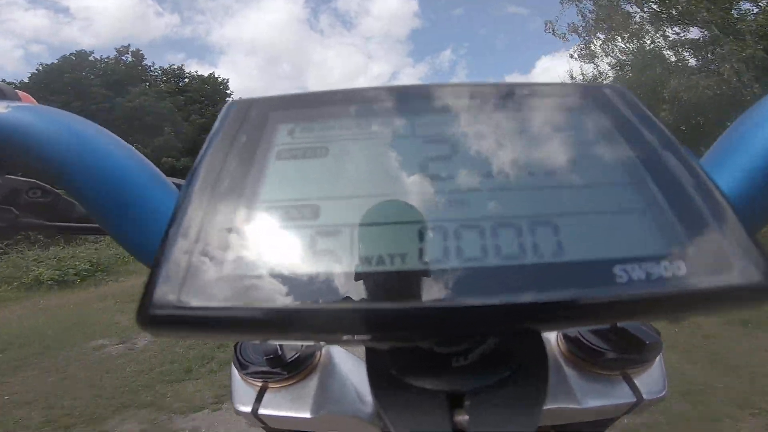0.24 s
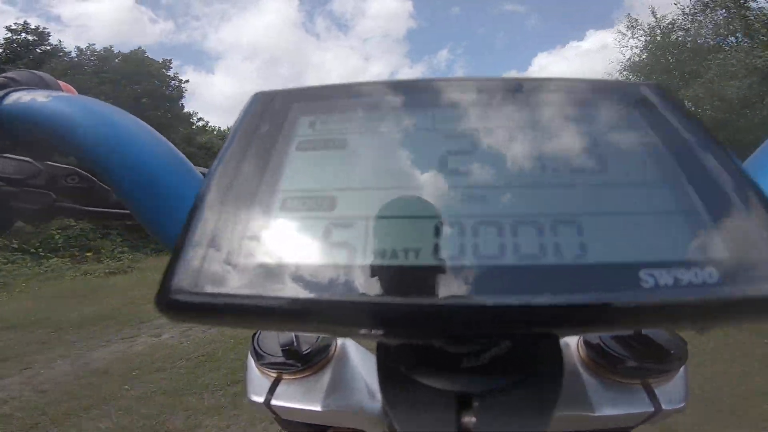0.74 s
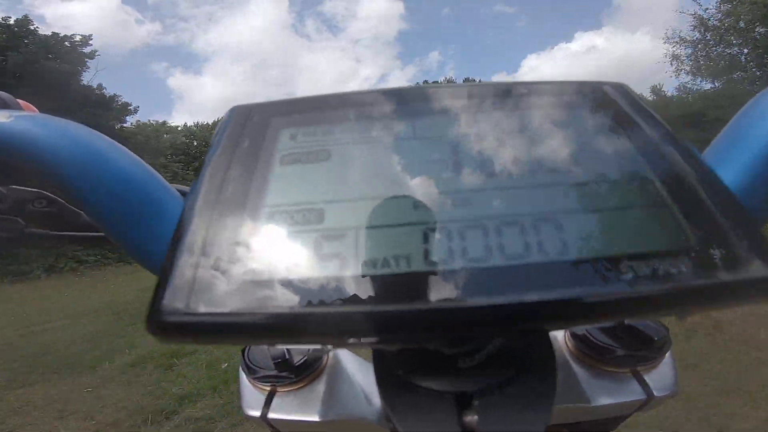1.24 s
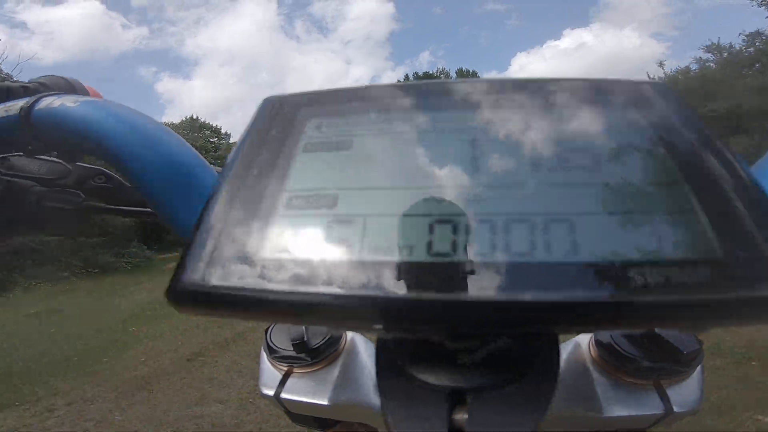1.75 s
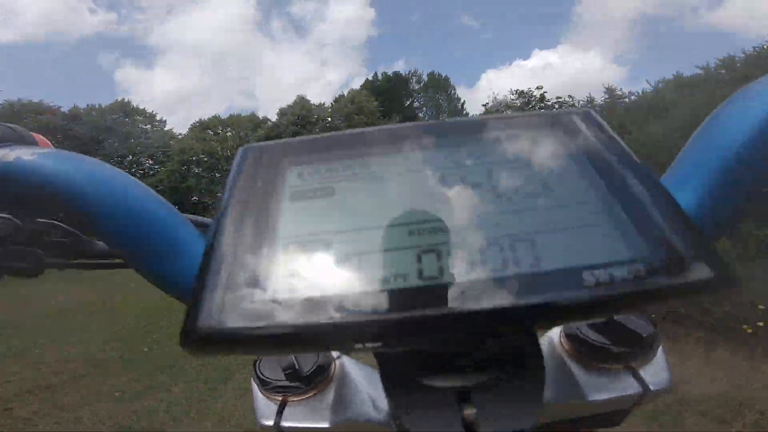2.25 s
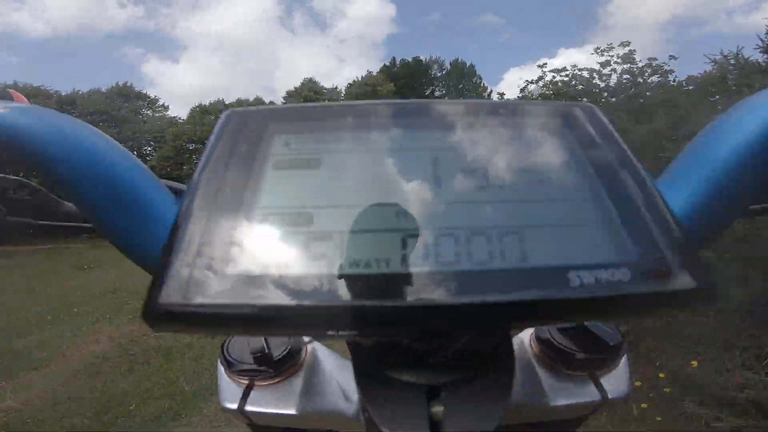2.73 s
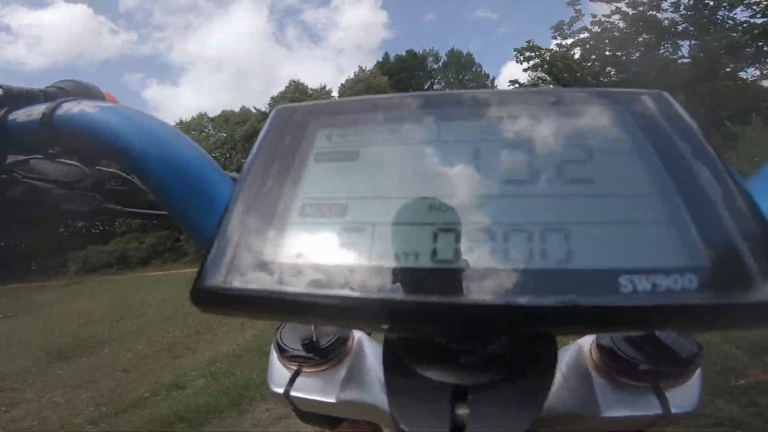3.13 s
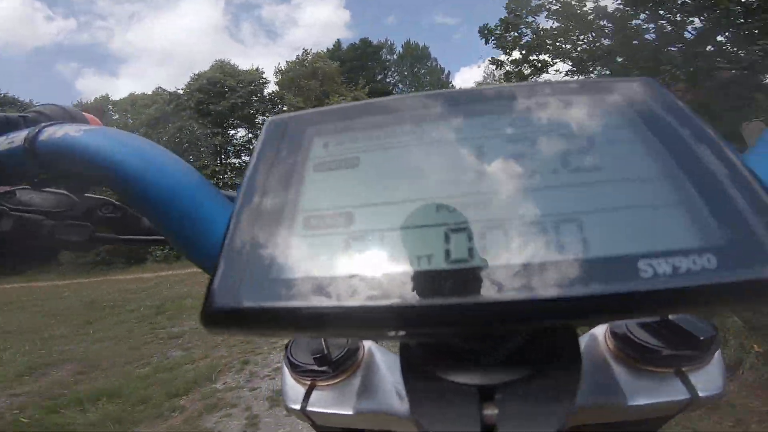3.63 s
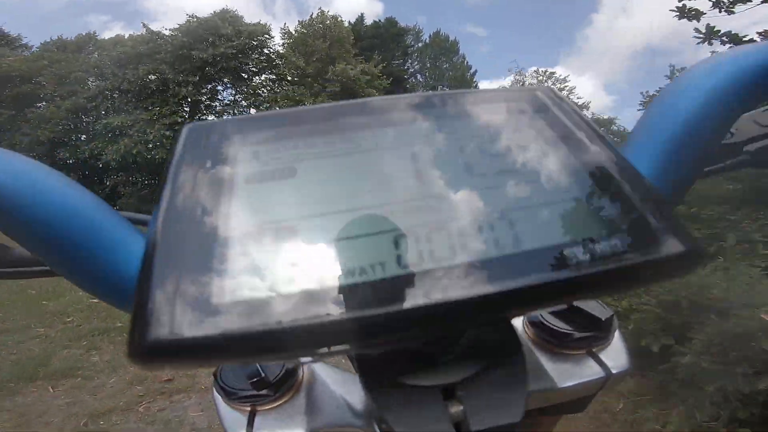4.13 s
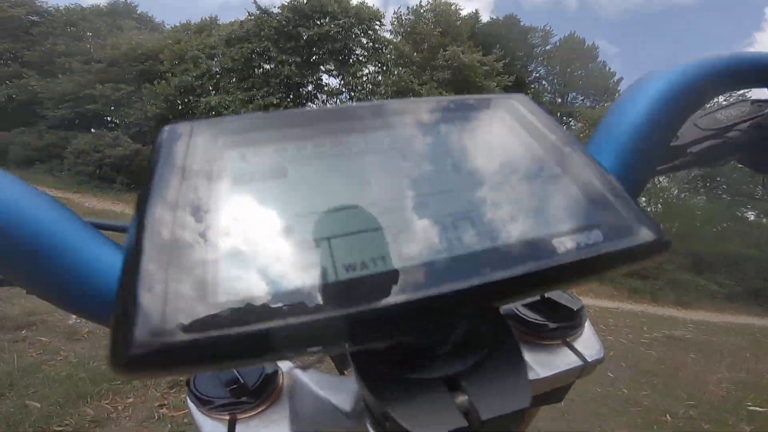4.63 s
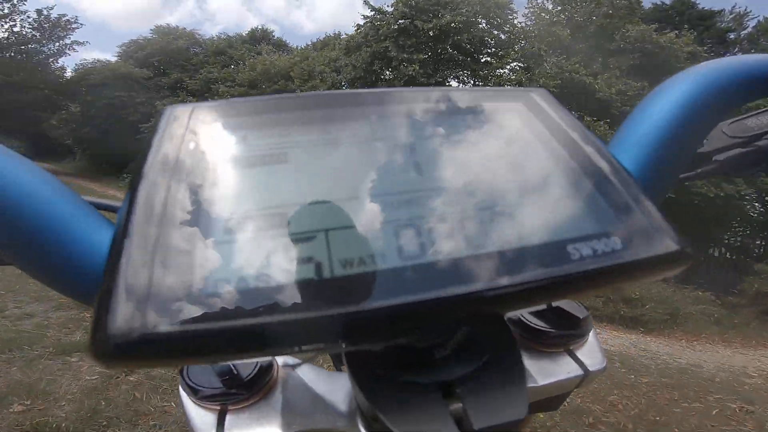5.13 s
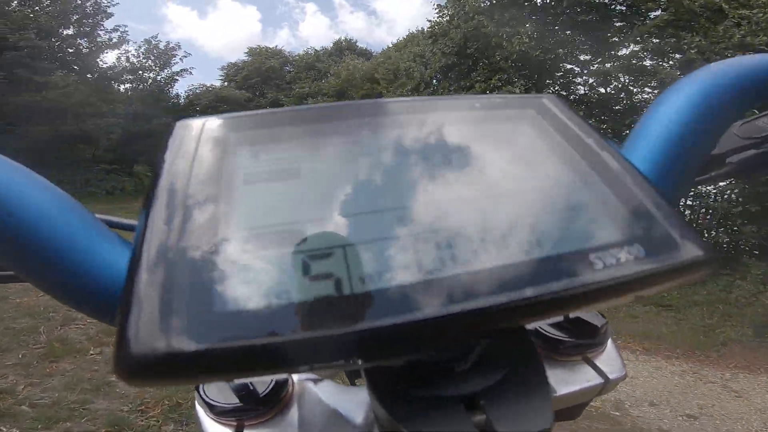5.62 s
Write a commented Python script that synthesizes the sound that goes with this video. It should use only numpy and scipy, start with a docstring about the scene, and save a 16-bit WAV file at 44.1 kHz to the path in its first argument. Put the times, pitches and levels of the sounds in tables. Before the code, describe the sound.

A bike rolls over bumpy turf, recorded dry and close from the handlebar in open air. Wind buffeting and deep soft bumps dominate. Early on there is a thin hub whine and rapid tiny ticks; after it fades, a sharp rattling clank and lighter knocks follow. A quieter ticking stretch leads to a rough burst of clunks, chatter and gusts, then softer tyre noise and faint grit crunch.

```python
"""Low wind buffeting is heard first, with thrumming tyres and a whirring hub, as an electric bike
coasts over bumpy grass, the microphone on its handlebar. Wind, tyres and grit are filtered noise;
knocks and rattle excite decaying frame modes; bumps add thuds and a damped handlebar sway.
The freewheel ticks in bursts of filtered noise and small falling tones. The hub is resonant grain
noise and a wavering whine, gone by 1.6 s; on bare ground grit pings off the metal."""
import sys
import numpy as np
from scipy import signal
from scipy.fft import rfft, irfft
from scipy.io import wavfile

SR = 44100
rng = np.random.default_rng(int(sys.argv[2]) if len(sys.argv) > 2 else 0)


def materialize(psi):
    """Save the field psi as 16-bit PCM at rate SR to the path in sys.argv[1].

    A 1-D psi becomes a single channel; in a 2-D psi each row is a channel.
    """
    bounded = np.clip(np.atleast_2d(psi).T, -1, 1)
    quanta = np.round(bounded * 32767).astype(np.int16)
    wavfile.write(sys.argv[1], SR, quanta)


N = 258858
TIME = np.arange(N) / SR

# air on the microphone: t/s, relative buffet level/dB
WIND = [(0.0, -19), (0.5, -22.5), (0.8, -23.5), (1.1, -30), (1.45, -26.5), (1.62, -29.5), (2.2, -30),
        (2.4, -23.5), (3.0, -31.5), (3.4, -29.5), (4.0, -21), (4.19, -23), (4.3, -13.5), (4.75, -16),
        (4.95, -23), (5.87, -31)]
# separate gusts on top of it: t/s, relative level/dB
GUSTS = [(0.048, -27), (0.961, -27.5), (1.266, -19), (1.756, -17), (2.366, -22.5), (2.632, -26.5),
         (3.073, -21.5), (3.167, -22), (4.042, -16.5), (4.108, -18), (5.248, -27), (5.356, -26.5),
         (5.524, -22.5)]
GUST_S = 0.025  # a gust falls to 1/e this far from its centre
# spectrum of the buffeting: f/Hz, relative density/dB
BUFFET = [(18, -1.5), (40, 6), (60, 4.5), (120, 2), (170, -10.5), (235, -26.5)]
# spectrum of the finer turbulence: f/Hz, relative density/dB
TURBULENCE = [(120, 0), (185, 4.5), (265, -16.5)]


def wind():
    """Turbulent pressure: low, lumpy gusts on the microphone; strong ones shed finer turbulence."""
    noise = colour(rng.standard_normal(N), BUFFET)
    eddies = steadied(noise, seconds=.06) * flutter(hz=18, depth_db=2.4)
    force = level(WIND)
    for s, db in GUSTS:
        force = force + amp(db) * np.exp(-((TIME - s) / GUST_S) ** 2)
    gusts = force * eddies
    # turbulence grows faster than the gust that sheds it
    push = evened(abs(signal.hilbert(gusts)) * force)
    turbulence = colour(rng.standard_normal(N), TURBULENCE) * push
    return amp(-4.5) * gusts + amp(-40.5) * turbulence


# the ride: t/s, frame rattle relative level/dB, tyre swish relative level/dB, tyre thrum level/dB
RIDE = [(0, -45, -61, -42), (.6, -72, -71.5, -45.5), (.75, -41, -59, -37.5), (.92, -59, -64.5, -54.5),
        (1.4, -48.5, -59, -45), (2.1, -48.5, -58, -49), (2.32, -36, -54, -39), (2.65, -50.5, -53, -42),
        (3.1, -46, -59.5, -51), (3.7, -46.5, -56.5, -49), (3.92, -36, -51, -40), (4.39, -40, -51.5, -43.5),
        (4.75, -42.5, -54, -59), (5.0, -52, -60.5, -45), (5.28, -57, -56.5, -64), (5.55, -49.5, -54.5, -48),
        (5.87, -51, -60.5, -59)]
# thick stalks snapping against the spokes: t/s, peak level/dB, f/Hz
STALKS = [(0.077, -34.5, 1900), (.259, -42.5, 3700), (0.351, -39.5, 1930), (.716, -41, 2320),
          (1.311, -42, 2230), (5.028, -42, 1860), (5.304, -41, 1680)]
# spectrum of the swish: f/Hz, relative density/dB
SWISH = [(300, 13.5), (1000, 13), (2200, 6), (2900, -1.5), (4400, 2.5), (5500, -8), (6900, -1.5),
         (9000, -9), (11000, -29)]
# spectrum of the tyre thrum and thuds: f/Hz, relative density/dB
THRUM = [(130, 5.5), (230, 4), (420, -9), (620, -17.5), (1200, -34)]


def tyres():
    """Friction and fracture noise: grass swishes, crackles and snaps; rough ground thrums the tyres."""
    swish = colour(rng.standard_normal(N), SWISH) * flutter(hz=60, depth_db=1.3)
    blades = crackle(per_s=190, low_hz=1700, high_hz=5600, fall_s=.0024)
    thrum = colour(rng.standard_normal(N), THRUM) * flutter(hz=25, depth_db=3)
    grass = amp(-1.5) * swish + amp(-5.0) * blades
    out = grass * level(RIDE, axis=2) + thrum * level(RIDE, axis=3)
    for s, db, hz in STALKS:
        add(out, s, amp(db) * crunch(hz, fall_s=0.0048))
    return out


# soft bumps taken by the tyres: t/s, thud peak level/dB, handlebar sway level/dB
THUDS = [(.14, -26.5, -17.5), (.275, -28.5, -16), (.353, -32, -24.5), (0.627, -20, -19),
         (0.704, -26.5, -18), (1.377, -28.5, -45), (1.458, -26.5, -22), (1.694, -27, -18.5),
         (2.297, -17.5, -18.5), (3.691, -24.5, -41), (3.77, -26.5, -11.5), (3.955, -19, -19.5),
         (5.024, -31.5, -18.5), (5.856, -25, -24)]
# typical sway pitch, and the time constants of its rise and fall
SWAY_HZ, SWAY_RISE_S, SWAY_FALL_S = 73.3, 0.0093, 0.011


def thuds():
    """Damped oscillation: turf thuds through the tyres and sets the handlebar swaying a few cycles."""
    out, t = np.zeros(N), np.arange(SR // 4) / SR
    swing = peaked((1 - np.exp(-t / SWAY_RISE_S)) * np.exp(-t / SWAY_FALL_S))
    for s, thud_db, sway_db in THUDS:
        lump = peaked(colour(burst(rise_s=.005, fall_s=.011), THRUM))
        hz = SWAY_HZ * np.exp(.12 * rng.standard_normal())
        add(out, s - .005, amp(thud_db) * lump)
        add(out, s - .005, amp(sway_db) * swing * np.sin(2 * np.pi * hz * t))
    return out


# blows on the frame: t/s, relative level/dB, hardness as relative treble level/dB
KNOCKS = [(.635, -28.5, -36), (1.689, -37.5, -2), (1.966, -28.5, -26), (2.282, -13, -9.5),
          (2.405, -24, -28), (2.499, -28.5, -29), (2.554, -33, -13), (2.657, -34, 0), (2.721, -36, -10),
          (2.829, -39, -3), (2.907, -30, -34), (3.772, -18, -31), (3.872, -18, -33), (3.943, -15.5, -11),
          (4.063, -21, -42), (4.126, -30.5, -12), (4.143, -25, -9.5), (4.324, -27, -35),
          (4.354, -27.5, -34), (4.437, -21, -12), (4.669, -19, -22), (4.752, -21.5, -19),
          (5.37, -41.5, -36)]
# only blows that are both heavier and harder than this bounce
REBOUND_ABOVE_DB, REBOUND_HARD_DB = -17, -16
# the bounces: delay after the blow t/s, level relative to the blow/dB
REBOUNDS = [(.013, -1), (0.0169, -3.5)]
JANGLE_S = 0.027  # decay constant of the jangle
# spectrum of jangling small metal parts: f/Hz, relative density/dB
JANGLE = [(3700, 1), (4500, 0), (5300, -14), (8000, -14)]


def knocks():
    """Impact and rebound: parts buzz, then strike; heavy, hard blows bounce twice and jangle on."""
    out = np.zeros(N)
    for s, db, hard_db in KNOCKS:
        blow = strike(db, hard_db)
        buzz = peaked(signal.fftconvolve(burst(rise_s=.009, fall_s=.017), blow))
        add(out, s, blow)
        add(out, s - .014, amp(db - 10.5) * buzz)
        if db > REBOUND_ABOVE_DB and hard_db > REBOUND_HARD_DB:
            for delay_s, weaker_db in REBOUNDS:
                add(out, s + delay_s, strike(db + weaker_db, hard_db))
            # the jangle starts with the last bounce
            jangle = colour(burst(rise_s=JANGLE_S / 4, fall_s=JANGLE_S), JANGLE)
            add(out, s + delay_s, amp(db - 38) * jangle)
    return out


# modes of the frame: f/Hz, relative level/dB, t60/s
FRAME = [(431, -7.5, 0.034), (527, 0.5, 0.022), (660, 3, 0.017), (765, 5, 0.02), (832.5, -4, 0.055),
         (888, -24, 0.33), (1054, -10.5, 0.0089), (1223, -6.5, 0.024), (1387, -3, 0.013), (1859, -5, 0.024),
         (4437, -19, 0.045)]
# spectrum of the crack of a hard contact: f/Hz, relative density/dB
CRACK = [(500, 23), (1300, 20.5), (2600, 11.5), (3400, 4), (4400, 5), (5300, -3), (8000, -5.5),
         (11000, -24)]
# above this blow level the lowest mode gains on the others, by so many dB per dB
FLEX_ABOVE_DB, FLEX_PER_DB = -21, 2


def strike(db, hard_db):
    """Modal excitation: one blow rings the frame; hard contact adds a stronger short crack."""
    hz, mode_db, t60 = np.transpose(FRAME)
    # a soft blow stays in contact longer and barely wakes the upper modes
    upper_db = np.interp(hard_db, [-32, -12], [-7, 1]) * (hz > 1000)
    # only a heavy blow flexes the whole frame in its lowest mode
    flex_db = FLEX_PER_DB * max(db - FLEX_ABOVE_DB, 0) * (hz == hz.min())
    modes = np.transpose([hz, mode_db + upper_db + flex_db, t60])
    body = ring(modes, scatter_db=1.5, detune=.012)
    crack = peaked(colour(burst(rise_s=0.0004, fall_s=0.0055), CRACK))
    return amp(db) * (amp(1.0) * body + amp(hard_db + 6.0) * crack)


def rattle(count=4):
    """Repeated impact: loose fittings chatter in clumps on the frame modes, with sharper clacks."""
    ringing = np.zeros(N)
    for _ in range(count):
        chatter = grains(per_s=150, spread_db=3.5) * flutter(hz=30, depth_db=3)
        # each fitting rings the frame its own way
        ringing += signal.oaconvolve(chatter, ring(FRAME, scatter_db=1.5, detune=.012))[:N]
    clacks = crackle(per_s=24, low_hz=800, high_hz=3000, fall_s=.003)
    return (amp(-7.5) * evened(ringing) + amp(-17.5) * clacks) * level(RIDE, axis=1)


# runs of loud freewheel ticks: start t/s, length/s, time between drops/s
TICK_RUNS = [(0.779, .11, 0.018), (.982, .1, 0.021), (1.194, .18, 0.021), (1.501, .1, 0.02),
             (1.693, .13, 0.023), (2.097, .11, 0.03), (2.779, .1, 0.026), (3.125, .125, 0.021),
             (3.547, .135, 0.026)]
# single sharp freewheel clicks: t/s, peak level/dB
CLICKS = [(2.752, -41), (2.868, -42)]
# spectrum of the pawl that squeaks: f/Hz, relative density/dB
SQUEAKY_BODY = [(1500, 5.5), (2900, -12), (3900, 5.5), (4600, -6), (7000, -1), (7700, -14.5),
                (10000, -24.5)]
# spectrum of the pawl that lands cleanly: f/Hz, relative density/dB
CLEAN_BODY = [(1700, -4), (2280, 2.5), (2700, -17), (4400, -8.5), (5300, -26), (6800, -14), (7900, -36)]
TOOTH_S = .0222  # time between the faint pawl drops
# mean starting pitch of a squeak, its mean fall, its mean level and its length
SQUEAK_HZ, SQUEAK_FALL_HZ, SQUEAK_DB, SLIDE_S = 8480, 1000, -64.5, 0.007


def freewheel():
    """Ratchet action: two pawls drop in turn; one lands cleanly, the other squeaks over its tooth."""
    loud, faint = np.zeros((2, N))
    for start, length, step_s in TICK_RUNS:
        for k, s in enumerate(np.arange(start, start + length, step_s)):
            db, late_s = rng.standard_normal(2) * [3, .0005]
            s += late_s
            if k % 2 == 0:
                add(loud, s - SLIDE_S, amp(db + SQUEAK_DB) * squeak())
                add(loud, s - .0025, pawl_click(db=db - 52.0, body=SQUEAKY_BODY, rise_s=0.0016))
            else:
                add(loud, s - .0015, pawl_click(db=db - 49, body=CLEAN_BODY, rise_s=0.0008))
    for s, db in CLICKS:
        add(loud, s, amp(db) * crunch(hz=5000, fall_s=.001))
    # throughout, faint drops vary at random in strength, so that only the odd one stands out
    for s in np.arange(0, N / SR, TOOTH_S):
        jitter, strength = rng.random(2)
        click = pawl_click(db=9, body=SQUEAKY_BODY, rise_s=.0025)
        add(faint, s + .014 * jitter, strength ** 5 * click)
    return loud + faint * level(RIDE, axis=2)


def pawl_click(db, body, rise_s):
    """Friction, then impact: the pawl scrapes down the tooth and lands, ringing the hub shell."""
    return amp(db) * colour(burst(rise_s=rise_s, fall_s=0.0037), body)


def squeak():
    """Frictional tone: the tiny falling squeak of a pawl sliding off its tooth."""
    u = np.linspace(0, 1, int(SLIDE_S * SR))
    hz = (SQUEAK_HZ - SQUEAK_FALL_HZ * u ** 3) * (1 + .008 * rng.standard_normal())
    return np.sin(2 * np.pi * np.cumsum(hz) / SR) * np.sin(np.pi * u)


# the hub: t/s, whirr level/dB, whine relative level/dB
WHIRR = [(0, -51.5, -67), (1.3, -55, -58.5), (1.47, -58, -61.5), (1.6, -84, -87)]
# lines of the whine: f/Hz, wander/Hz, relative level/dB
WHINE = [(1462, 32, 1.5), (5840, 60, -18)]
# resonances of the whirr: f/Hz, width/Hz, relative level/dB
WHIRR_BODY = [(1260, 850, -4.5), (1800, 360, -5), (2360, 260, -12.5)]


def hub():
    """Resonance: grains whirr in the hub's modes and a wavering whine grows; both then fall away."""
    hz = np.fft.rfftfreq(N, 1 / SR)
    power = np.zeros(len(hz))
    for centre, width, db in WHIRR_BODY:
        power += amp(db) ** 2 / (1 + ((hz - centre) / width * 2) ** 2)
    body = np.sqrt(power / (1 + (hz / 6000) ** 10))  # treble rolls off above 6 kHz
    spectrum = rfft(grains(per_s=1500, spread_db=-1.5)) * body
    whirr = evened(irfft(spectrum, N)) * flutter(hz=40, depth_db=1.3)
    whine = sum(amp(db) * wavering(pitch, wander) for pitch, wander, db in WHINE)
    return whirr * level(WHIRR, axis=1) + whine * level(WHIRR, axis=2)


# sprays of grit flung against the bike: centre t/s, relative level/dB, decay constant/s
GRIT = [(3.774, -53.5, 0.0056), (3.862, -57.5, 0.017), (3.96, -49, 0.0044), (4.137, -53, 0.016),
        (5.688, -50, 0.0052)]
# crunch of the tyres on a gravel path: t/s, relative level/dB
GRAVEL = [(5.3, -84), (5.55, -67), (5.87, -66)]
# spectrum of the grit: f/Hz, relative density/dB
GRIT_BODY = [(1900, -4.5), (7500, -7), (10800, -18.5), (14500, -13.5), (15700, -26)]
# modes of the brake disc: f/Hz, relative level/dB, t60/s
METAL = [(11130, -10, .07), (14110, 0, .1)]


def grit():
    """Granular impact: grit crunches under the tyres; sprays patter and leave metal faintly ringing."""
    spray = np.zeros(N)
    for s, db, length in GRIT:
        add(spray, s - length / 2, amp(db) * burst(rise_s=length / 2, fall_s=length))
    ping = ring(METAL, scatter_db=0, detune=0)
    ringing = amp(-25) * signal.fftconvolve(spray, ping / np.linalg.norm(ping))[:N]
    fizz = grains(per_s=6000, spread_db=3.5) * flutter(hz=40, depth_db=2.5) * level(GRAVEL)
    return colour(spray + fizz, GRIT_BODY) + ringing


def ring(modes, scatter_db, detune, order=8192):
    """Modal superposition: decaying sines, peak 1; each blow weights and tunes the modes anew."""
    t = np.arange(order) / SR
    hz, db, t60 = np.transpose(modes)[:, :, None]
    weight, shift, side = rng.standard_normal((3, len(modes), 1))
    decay = np.exp(-np.log(1000) * t / t60)
    swing = np.sign(side) * np.sin(2 * np.pi * hz * (1 + detune * shift) * t)
    contact = 1 - np.exp(-(t / .0003) ** 2)  # softens the onset
    return peaked(contact * (amp(db + scatter_db * weight) * decay * swing).sum(0))


def burst(rise_s, fall_s, order=8192):
    """Transient noise: a puff that swells and dies, its envelope peaking at 1."""
    t = np.arange(order) / SR
    shape = (1 - np.exp(-t / rise_s)) ** 2 * np.exp(-t / fall_s)
    return peaked(shape) * rng.standard_normal(order)


def crunch(hz, fall_s):
    """Band-limited transient: one brief crunch coloured around hz, peak 1."""
    band = [(hz / 2, -5), (hz, 0), (hz * 1.4, -4)]
    return peaked(colour(burst(rise_s=fall_s / 2, fall_s=fall_s), band))


def crackle(per_s, low_hz, high_hz, fall_s, count=12):
    """Random superposition: crunches at random moments in count different colours, rms 1."""
    total = np.zeros(N)
    for hz in np.geomspace(low_hz, high_hz, count):
        total += signal.oaconvolve(grains(per_s / count, spread_db=3.5), crunch(hz, fall_s))[:N]
    return evened(total)


def grains(per_s, spread_db):
    """Shot noise: random tiny impacts; a few are much larger, or smaller if the spread is negative."""
    size = amp(spread_db * np.minimum(rng.exponential(1, N), 4))
    return evened(size * rng.choice([-1, 1], N) * (rng.random(N) < per_s / SR))


def wavering(hz, wander_hz):
    """Random modulation: a rough tone of rms 1, unsteady in pitch and strength."""
    turns = np.cumsum(hz + wander_hz * wobble(hz=35)) / SR
    return evened(np.sin(2 * np.pi * turns) * flutter(hz=60, depth_db=4))


def flutter(hz, depth_db):
    """Amplitude modulation: a random gain that wavers mostly below hz."""
    return amp(depth_db * wobble(hz))


def wobble(hz):
    """Low-pass noise: a random curve of rms 1 that wavers mostly below hz."""
    keep = 1 / (1 + (np.fft.rfftfreq(N, 1 / SR) / hz) ** 4)
    return evened(irfft(rfft(rng.standard_normal(N)) * keep, N))


def colour(x, points, size=8192):
    """Minimum-phase filtering: a causal filter of unit energy with the given spectrum."""
    hz, db = np.transpose(points)
    at = np.log(abs(np.fft.fftfreq(size, 1 / SR)) + 1)
    # beyond the table: 36 dB per octave upwards, 12 dB per octave downwards
    above = np.maximum(at - np.log(hz[-1]), 0)
    below = np.maximum(np.log(hz[0]) - at, 0)
    inside = np.log(amp(np.interp(at, np.log(hz), db - db.max())))
    log_gain = np.maximum(inside - 6 * above - 2 * below, -13)
    # the Hilbert transform of the log gain gives the minimum phase
    taps = np.fft.ifft(np.exp(np.conj(signal.hilbert(log_gain)))).real[:size // 2]
    return signal.fftconvolve(x, taps / np.linalg.norm(taps))[:len(x)]


def steadied(x, seconds):
    """Envelope normalization: holds the local rms near 1, keeping the faster lumps."""
    window = signal.windows.hann(int(seconds * SR))
    power = signal.fftconvolve(x ** 2, window / window.sum(), "same")
    return x / np.sqrt(abs(power) + 1e-12)


def amp(db):
    """Logarithmic level: decibels to gain."""
    return 10 ** (np.asarray(db) / 20)


def evened(x):
    """Power normalization: scales to rms 1."""
    return x / np.sqrt(np.mean(x ** 2) + 1e-20)


def peaked(x):
    """Peak normalization: scales to peak 1."""
    return x / abs(x).max()


def level(rows, axis=1):
    """Level interpolation: gain at every sample from one dB column of a curve."""
    rows = np.array(rows)
    return amp(np.interp(TIME, rows[:, 0], rows[:, axis]))


def add(mix, s, sound):
    """Linear superposition: mixes a sound in at time s, or at the start if s is negative."""
    part = mix[max(round(s * SR), 0):][:len(sound)]
    part += sound[:len(part)]


def scene():
    """Superposition of all sources at the handlebar, in the open air."""
    bike = tyres() + thuds() + knocks() + rattle() + freewheel() + hub() + grit()
    return (wind() + bike)[None]


EDGE_HZ = 15700  # upper band limit


def record(dry):
    """Band limitation: the recorder's linear-phase low-pass filter."""
    low_pass = signal.firwin(511, EDGE_HZ, window=("kaiser", 9), fs=SR)
    return signal.oaconvolve(dry, low_pass[None], "same")


dry = scene()
out = record(dry)
materialize(out)
```